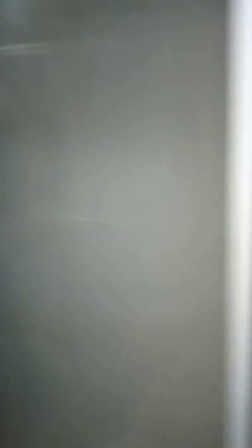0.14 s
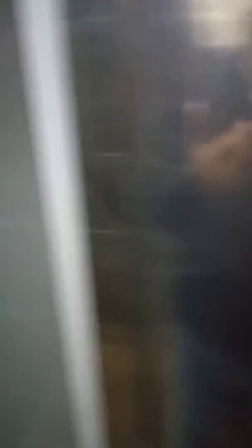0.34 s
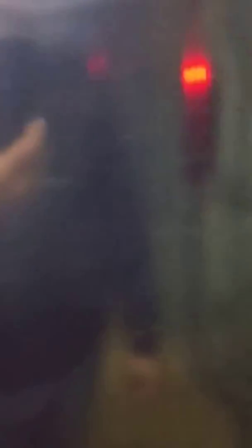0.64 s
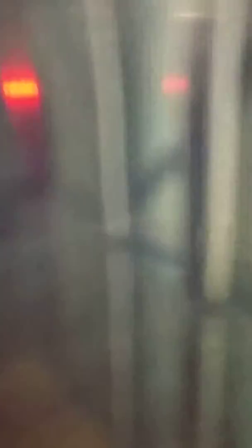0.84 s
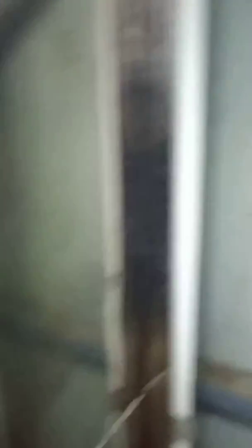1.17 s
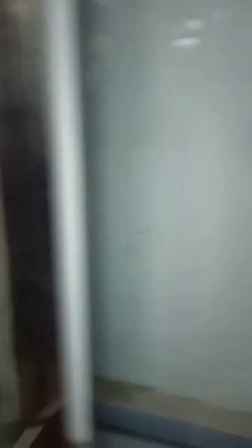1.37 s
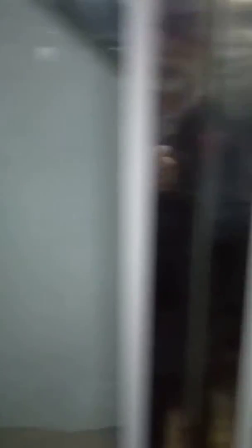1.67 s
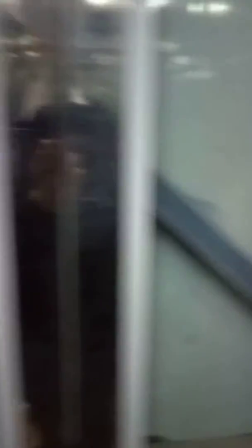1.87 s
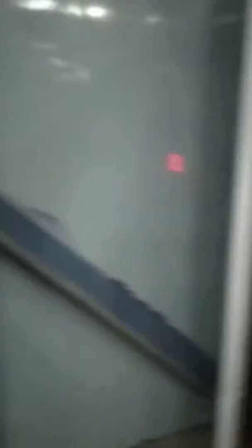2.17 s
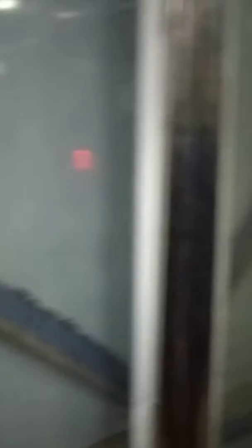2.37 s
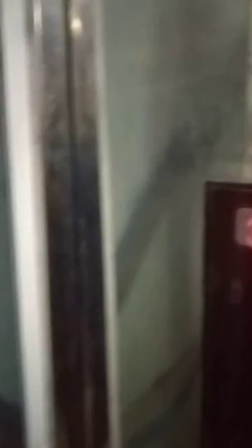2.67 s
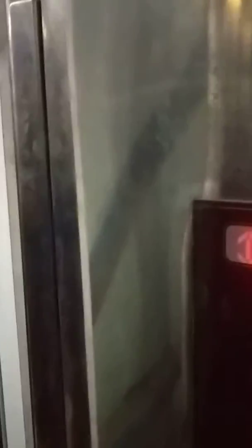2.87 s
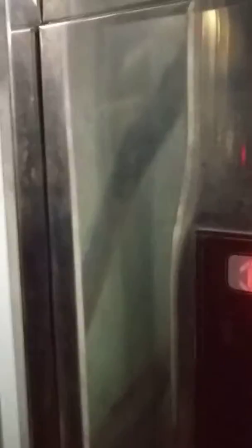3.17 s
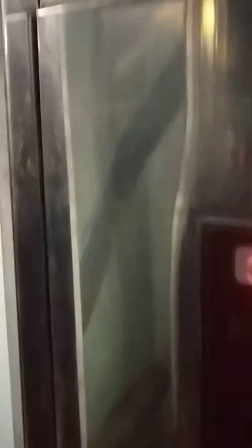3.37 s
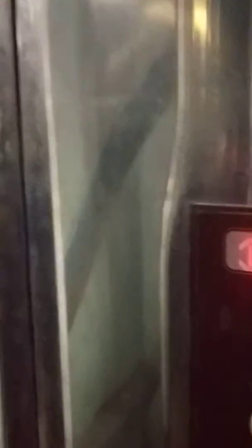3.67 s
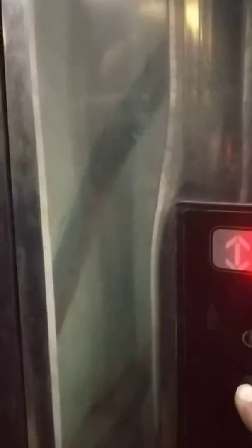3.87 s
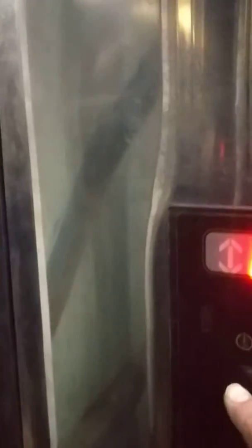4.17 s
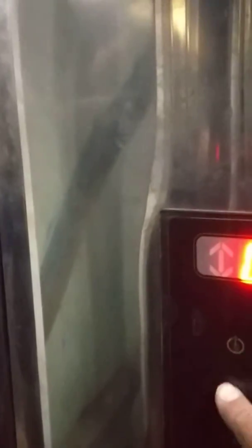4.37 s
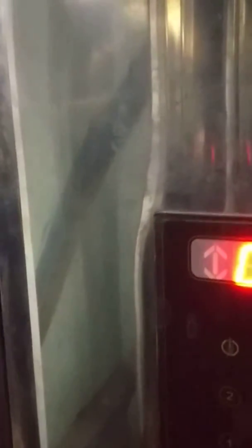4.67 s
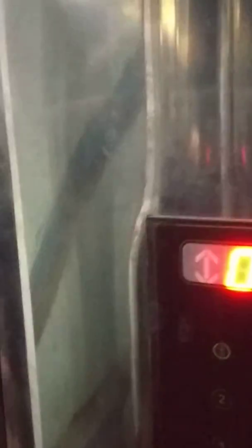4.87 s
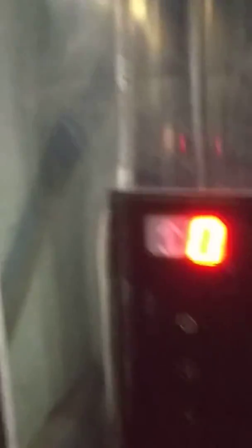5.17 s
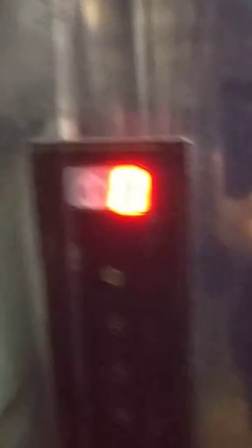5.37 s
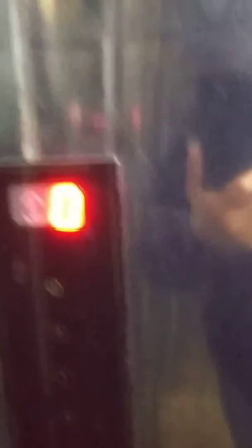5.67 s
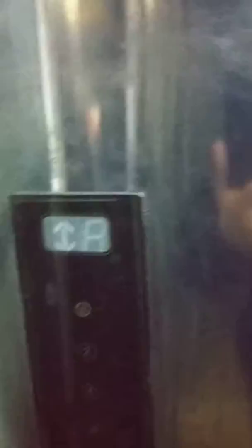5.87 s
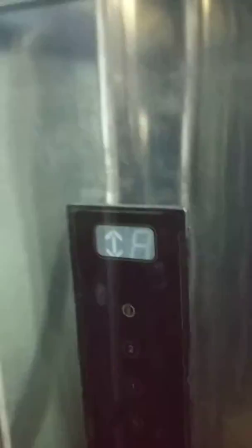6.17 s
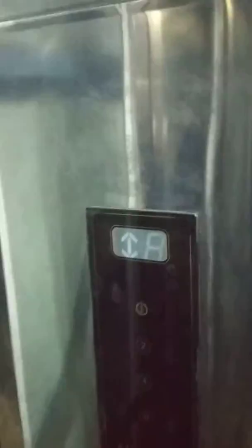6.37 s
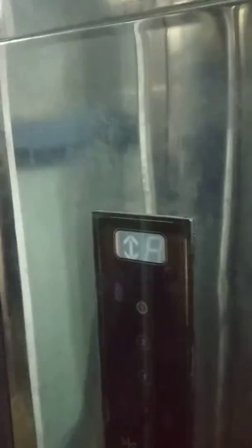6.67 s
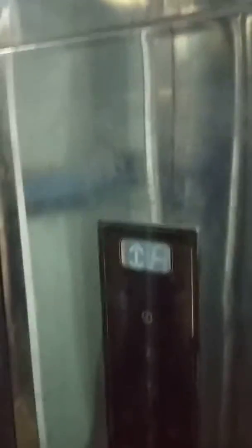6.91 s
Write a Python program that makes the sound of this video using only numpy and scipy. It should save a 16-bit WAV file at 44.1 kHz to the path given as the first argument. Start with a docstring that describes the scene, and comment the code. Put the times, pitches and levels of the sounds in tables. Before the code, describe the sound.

Inside a small humming lift, a jacket swishes and shoes scuff, a button clicks, then the car sets off with drones, rumble, knocks and rattling doors.

```python
"""A ride in a glass lift

Inside a small glass and steel lift car a passenger turns round: shoes scuff and a jacket swishes over a mains hum.
A floor button clicks, the drive whines and drones, and the car sets off with a rumble.
Its guide shoes rub along the rails and the glass doors tick and knock in their tracks.
Rubbing is shaped noise, knocks are ringing modes, and hum, drones and squeak are sine tones."""
import sys
import numpy as np
from scipy import signal
from scipy.fft import rfft, irfft
from scipy.io import wavfile

SR = 44100
rng = np.random.default_rng(int(sys.argv[2]) if len(sys.argv) > 2 else 0)


def inscribe(sig):
    """Save sig as 16-bit PCM at rate SR to the path in sys.argv[1].

    A 1-D sig is mono; a 2-D sig holds one channel per row.
    Samples are clipped to [-1, 1] before scaling.
    """
    pcm = np.round(np.clip(np.atleast_2d(sig).T, -1, 1) * 32767)
    wavfile.write(sys.argv[1], SR, pcm.astype(np.int16))


N = 310464

# Half widths below run from a peak to where the gain has halved.
# A t60 is the time in seconds for a sound to fade by 60 dB.

# Mains hum. Each row: pitch in Hz, level in dB.
HUM = [(100, -45.5), (600, -75)]
# Strength of the hum over time. Each row: time in seconds, gain in dB added to the hum.
HUM_LEVEL = [(0.6, -30), (1.4, -8.5), (1.9, -0.5), (2.6, -4.5), (3.1, 1.5), (4.35, 1), (4.6, -9)]
HUM_WOBBLE_RAD = 0.21  # phase wobble of the lowest hum tone
# Air of the shaft. Each row: frequency in Hz, strength per Hz in dB.
AIR_SPECTRUM = [(12, -6), (20, 10.5), (35, 4), (70, -2.5), (140, -11.5), (200, -18), (400, -23), (800, -33),
                (2000, -38.5), (3800, -42), (8500, -34.5), (12000, -43.5), (16000, -50.5)]
AIR_DB, STIRRED_AIR_DB = -43, 3  # the second is added until the passenger comes to rest

# Resonances of the panels. Each row: frequency in Hz, half width in Hz, level in dB.
PANEL_MODES = [(215, 7.7, 0), (267.5, 7.1, 5.5), (336, 7.1, 3.5), (452, 86, 4.5), (570, 480, -3),
               (652, 14, -5.5)]
PANEL_RING_DB, PANEL_RING_S, PANEL_RING_T60_S = -53, 0.43, 0.62

# Hollow groans of the frame. Each row: peak time in seconds, level in dB, centre in Hz,
# half width in Hz, fall time in seconds.
GROANS = [(.01, -46.5, 700, 460, 0.056), (0.892, -49.5, 970, 790, 0.093), (2.603, -46, 900, 240, 0.041),
          (2.603, -51, 1640, 110, 0.022), (4.92, -42.5, 940, 580, 0.049), (5.426, -40.5, 780, 280, 0.036),
          (5.548, -37.5, 940, 330, 0.026), (5.7, -45.5, 1990, 150, 0.059)]
GROAN_RISE_S, GROAN_JERKS_PER_S = 0.024, 140

# Soft bumps of the hand that holds the phone. Each row: time in seconds, peak in dB before the bass cut.
BUMPS = [(0.057, -25.5), (.104, -20.5), (.149, -28), (.268, -25), (0.325, -36), (.368, -29)]
BUMP_WIDTH_S = 0.0074

# Jacket swishes. Each row: start in seconds, length in seconds, attack in seconds, level in dB,
# growth over the stroke in dB, body against hiss in dB.
SWISHES = [(.27, 0.21, 0.11, -43, -2, -7), (1.065, 0.34, 0.12, -39.5, -5, -5),
           (1.34, 0.42, 0.2, -35, 1.5, -8.5), (2.745, 0.32, 0.13, -38.5, -1, -5),
           (6.6, 0.17, 0.023, -44.5, 13.5, -2)]
# Soles dragged over the floor. Each row: start in seconds, length in seconds, attack in seconds,
# level in dB, growth over the stroke in dB, body against hiss in dB.
SCUFFS = [(.68, 0.15, 0.019, -35, 3.5, -10), (2.097, 0.037, 0.01, -39, -2, -8.5),
          (2.185, 0.035, 0.039, -50, -1, -16), (2.376, 0.13, 0.07, -30, 1, -17),
          (2.408, 0.12, 0.021, -37.5, -1.5, 2.5)]
# Guide shoes catching on the rails. Each row: start in seconds, length in seconds, attack in seconds,
# level in dB, growth over the stroke in dB, body against hiss in dB.
SCRAPES = [(4.862, 0.064, 0.022, -60.5, -11, 5), (5.238, 0.03, 0.0068, -46.5, -2, -1),
           (5.748, 0.057, 0.04, -32, 2, -10.5), (6.725, 0.044, 0.037, -41, 2.5, -1.5)]
SWISH_T60_S, SCUFF_T60_S, SCRAPE_T60_S = 0.24, 0.2, 0.3
HISS_BAND_HZ, BODY_BAND_HZ = (4000, 12000), (700, 3000)  # where the two parts are set to rms 1
# Cloth of the jacket. Each row: frequency in Hz, strength per Hz in dB.
CLOTH = [(200, -8.5), (380, -4), (600, -6.5), (900, -4), (1400, -5), (2300, -0.5), (3000, -5), (3700, -6),
         (5500, 0), (9000, 2.5), (10200, 0), (11800, -10.5), (16000, -14.5)]
# Soles on the floor. Each row: frequency in Hz, strength per Hz in dB.
SOLE = [(200, -38), (600, 0), (1000, 1.5), (1300, 4), (1550, 3), (2060, 10), (3000, 2), (3700, -0.5),
        (5200, 5.5), (8500, 9), (10300, 6.5), (12000, -4), (16000, -8)]
# Guide shoes on the rails. Each row: frequency in Hz, strength per Hz in dB.
SLIDE = [(500, -0.5), (1200, 0.5), (2200, 5), (3000, 0), (3900, -4), (5500, -0.5), (9000, 1.5), (10500, -5),
         (12500, -15), (16000, -21)]
# Glass panes that sing when something rubs. Each row: frequency in Hz, half width in Hz, level in dB.
PANE_RINGS = [(1089, 2.8, -6), (2074, 2.2, 2.5), (5160, 9.2, -7)]
# The passenger turns round, stirring the jacket.
TURN_S, TURN_LENGTH_S, TURN_ATTACK_S, TURN_T60_S = 0.63, 2.537, 0.25, 0.92
RUSTLE_DB = -56

# Blows on the floor and frame. Each row: time in seconds, level in dB, contact time in seconds.
KNOCKS = [(0.684, -35, 0.01), (0.828, -36.5, 0.017), (1.8, -37.5, 0.0023), (1.808, -34, 0.012),
          (2.381, -28.5, 0.0016), (2.388, -35.5, 0.00057), (2.398, -38.5, 0.01), (2.418, -54, .0005),
          (2.503, -40.5, 0.0013), (2.521, -35, 0.0072), (2.555, -46, 0.015), (4.351, -44, 0.0016),
          (4.866, -34.5, 0.008), (4.893, -41.5, 0.0011), (5.383, -33, 0.0034), (5.515, -38.5, 0.00039),
          (5.548, -45, 0.00036), (5.747, -28, 0.0016), (5.774, -36.5, 0.00088), (5.94, -32.5, 0.012)]
# Ringing of floor and walls. Each row: frequency in Hz, level in dB, t60 in seconds.
FLOOR_MODES = [(83, -4.5, 0.079), (103, 1, 0.17), (152.7, -9.5, 0.13), (218, -1, .05), (270, 2, 0.043),
               (332, -4, 0.13), (424.5, -4, 0.31), (530, -18, 0.074), (690, 1.5, 0.093), (856, 2, 0.066),
               (1100, -8, 0.13)]

# Doors chattering in their tracks. Each row: time in seconds, level in dB, t60 in seconds.
TICKS = [(2.703, -41.5, 0.53), (5.113, -42.5, 0.13), (5.29, -38, .12), (5.357, -32, 0.34),
         (6.242, -37.5, 0.29), (6.339, -32, 0.017), (6.973, -40, 0.18)]
# Glass doors against metal. Each row: frequency in Hz, strength per Hz in dB.
DOOR = [(500, -6.5), (2100, -12), (3700, -11.5), (5500, -10), (8000, -4.5), (10000, -8.5), (12000, -22),
        (16000, -30)]
ONSET_S, CHATTER_RISE_S = 0.0014, 0.0016

# Snap and end stop of the button. Each row: time in seconds, crack in dB, ring in dB.
BUTTON = [(4.323, -34.5, -51), (4.34, -43, -48.5), (4.352, -43, -42.5), (4.363, -48, -45)]
# Button spring and panel modes. Each row: frequency in Hz, half width in Hz, level in dB, t60 in seconds.
BUTTON_MODES = [(390, 45, 2.5, 0.047), (2400, 230, -5.5, 0.067), (3350, 310, -24, 0.039),
                (5070, 110, -11, 0.11), (6550, 260, -8.5, 0.085), (8950, 200, -4, 0.1)]
# Crack of the spring. Each row: frequency in Hz, strength per Hz in dB.
CRACK = [(400, -8), (900, -11), (1500, -9), (2400, -12), (4000, -15), (5000, -6), (5900, -13), (8000, 4),
         (9600, 9), (12000, -7), (16000, -9)]
CRACK_T60_S, SNAP_TICK_DB, SNAP_TICK_T60_S = 0.072, -3, 0.0082

# Drones of the loaded frame. Each row: start in seconds, length in seconds, starting pitch in Hz,
# level in dB, growth in dB.
DRONES = [(4.372, 0.34, 268, -54.5, 1), (4.374, 0.13, 169, -43.5, -6), (4.408, 0.255, 202.3, -44.5, -5),
          (4.443, 0.19, 133.1, -42, -9.5), (4.666, 0.23, 138.5, -35.5, 4.5)]
SAG_HZ_PER_S, DRONE_ATTACK_S, DRONE_T60_S = 29.6, 0.043, 0.2
DRONE_WAVER, DRONE_THROB_DB = 0.0242, 2.5  # pitch waver as a fraction, level waver
# Shudder of the frame. Each row: frequency in Hz, half width in Hz, level in dB.
FRAME_MODES = [(106, 21, 4), (170, 21, 4), (250, 13, -2.5), (350, 66, -10.5)]
# Switching whine and its skirt. Each row: frequency in Hz, half width in Hz, level in dB.
WHINE = [(12000, 20, -4), (12060, 150, -4)]
DRIVE_ON_S, BRAKE_OFF_S, DRIVE_ATTACK_S = 4.38, 4.78, 0.066
SHUDDER_DB, WHINE_DB = -47, -63.5

# Low rumble of the ride. Each row: frequency in Hz, strength per Hz in dB.
RUMBLE = [(15, 3.5), (30, -2), (70, -10), (140, -8.5), (250, -23.5), (600, -36), (2000, -74)]
# Resonances of the moving car. Each row: frequency in Hz, half width in Hz, level in dB.
CAR_MODES = [(71.2, 21, 0.5), (135, 34, -4.5)]
# Resonances of the rails. Each row: frequency in Hz, half width in Hz, level in dB.
RAIL_MODES = [(730, 123, 8.5), (940, 34, -13), (1080, 11, -5), (1350, 320, 0), (2010, 11, -21)]
SET_OFF_S, RUN_UP_S = 4.615, 0.82
# Levels at full speed, before the shoes bind.
RUMBLE_DB, CAR_DB, PANEL_DB, RAIL_DB, SLIDE_DB = -34.5, -37, -43.5, -53.5, -48
# The guide shoes bind for a moment as the car leaves the landing, which lifts these sounds.
BIND_S, BIND_WIDTH_S = 5.51, 0.42
BIND_CAR_DB, BIND_RAIL_DB, BIND_SLIDE_DB = 2.5, 8, 5.5

SQUEAK_S, SQUEAK_HZ, SQUEAK_DB, SQUEAK_WIDTH_S = 5.232, 930, -41, 0.015
SQUEAK_TAIL_DB, SQUEAK_TAIL_S = -18, 0.075
TOP_HZ = 15850  # highest frequency kept

T = np.arange(N) / SR
FREQ = np.maximum(np.arange(N // 2 + 1) * SR / N, 1)


def undb(db):
    """Turn decibels into gain."""
    return 10 ** (np.asarray(db) / 20)


def walk(rate):
    """Random wander with spread near 1, drawn as straight lines between random points, rate per second."""
    knots = rng.standard_normal(2048)
    return 1.344 * np.interp(T * rate, np.arange(len(knots)), knots)


def colour(points):
    """Gain at each frequency, drawn through (Hz, dB) points."""
    hz, db = np.transpose(points)
    return undb(np.interp(np.log(FREQ), np.log(hz), db))


def resonances(modes):
    """Gain at each frequency of resonances with steep skirts."""
    gain = 0
    for hz, width, db in modes:
        distance = (FREQ ** 2 - hz ** 2) / (FREQ * width * 2)
        gain = gain + undb(db) / np.sqrt(width) / (1 + distance ** 2)
    return gain


def noise(shape, band=(0, SR), grain_db=0, apart_hz=800, left_db=4):
    """Grainy stereo noise: both sides share the bass, differ higher up, and lean left if left_db is positive."""
    grains = undb(grain_db * np.repeat(rng.standard_normal(N // 16 + 1), 16)[:N])
    mid, side = rfft(rng.standard_normal((2, N)) * grains) * shape
    spread = FREQ / np.hypot(FREQ, apart_hz)
    sides = np.array([[1], [-1]])  # left, right
    lean = colour([(550, -0.66), (1000, left_db), (5000, left_db), (12000, 0.57)]) ** (sides / 2)
    # the shared part is set to rms 1 within the band
    inside = irfft(mid * (FREQ > band[0]) * (FREQ < band[1]), N)
    return irfft((mid + sides * side * spread) * lean, N) / np.std(inside)


def decay(start, t60, rise=0.000094):
    """Envelope of a blow: a quick rise, then an exponential fade."""
    age = np.maximum(T - start, 0)
    fade = np.exp(-np.minimum(np.log(1000) * age / t60, 50))
    return (1 - np.exp(-age / rise)) * fade


def stroke(start, length, attack, t60, growth_db=0):
    """Envelope of a movement: it sets in, holds while growing or easing, and dies away."""
    age = T - start
    onset = np.sin(np.pi / 2 * np.clip(age / attack, 0, 1)) ** 2
    hold = undb(growth_db * (np.clip(age / length, 0, 1) - .5))
    fade = np.exp(-np.minimum(np.log(1000) * np.maximum(age - length, 0) / t60, 20))
    return onset * hold * fade


def stick_slip(rate, scatter_db, t60, count=1400):
    """Envelope, rms 1, of a contact that sticks and lets go in uneven jerks, about rate per second."""
    gaps = rng.gamma(3, 1 / 3, count)
    sizes = rng.standard_normal(count)
    at = (np.cumsum(gaps) * SR / rate).astype(int)
    jerks = np.bincount(at, undb(scatter_db * sizes), N)[:N]
    slips = signal.fftconvolve(jerks, decay(0, t60, ONSET_S)[:SR // 10])[:N]
    return slips / np.sqrt(np.mean(slips ** 2))


def ring(modes, scatter_db):
    """Ringing of struck modes: neighbours swing in opposite directions, each blow weights them differently."""
    t = T[:SR // 2]
    out = 0
    for k, (hz, db, t60) in enumerate(modes):
        gain = (-1) ** k * undb(db + scatter_db * rng.standard_normal())
        out = out + gain * np.sin(2 * np.pi * hz * t) * np.exp(-np.log(1000) * t / t60)
    return out


def add(out, start, sound):
    """Mix a sound in at its time."""
    i = max(int(start * SR), 0)
    out[..., i:i + sound.shape[-1]] += sound[..., :N - i]


def cabin(x, wet_db, t60=0.48):
    """Close hard walls: a dense, short echo that differs between left and right above the bass."""
    walls = noise(colour([(100, 4.0), (9000, -2.5), (16000, -19)]))
    tail = (walls * decay(0.00335, t60))[:, :SR // 2]
    tail = tail / np.sqrt(np.sum(tail ** 2) / 2)
    return x + undb(wet_db) * signal.fftconvolve(np.atleast_2d(x), tail, axes=1)[:, :N]


def reflections(count=9):
    """Colour of the nearest panes: faint copies a few milliseconds late, and the panes' own rings."""
    lags = rng.uniform(.003, .016, count)
    comb = np.abs(1 + .1 * np.exp(-2j * np.pi * np.outer(lags, FREQ)).sum(axis=0))
    rings = sum(undb(db) / (1 + ((FREQ - hz) / width) ** 2) for hz, width, db in PANE_RINGS)
    return comb * (1 + rings)


def rub(strokes, spectrum, t60, grain_db, catch_db):
    """Friction as grainy noise for tiny slips; each stroke has its own mix of mid-range body and bright hiss."""
    shape = colour(spectrum) * reflections()
    low = 1 / (1 + (FREQ / 3500) ** 6)
    hiss = noise(shape * np.sqrt(1 - low), HISS_BAND_HZ, grain_db)
    body = noise(shape * np.sqrt(low), BODY_BAND_HZ, grain_db)
    out = 0
    for s, length, attack, db, growth_db, body_db in strokes:
        mix = hiss + undb(body_db) * body
        out = out + undb(db) * mix * stroke(s, length, attack, t60, growth_db)
    return out * undb(catch_db * walk(40))  # the contact catches and eases


def hum():
    """Mains hum: steady sine tones with a slight shared wobble and a changing strength."""
    wobble = HUM_WOBBLE_RAD * walk(13) / HUM[0][0]
    tones = sum(undb(db) * np.sqrt(2) * np.sin(hz * (2 * np.pi * T + wobble)) for hz, db in HUM)
    return tones * undb(np.interp(T, *np.transpose(HUM_LEVEL)) + 1.5 * walk(9))


def shaft_air():
    """Air of the shaft: soft noise that settles as the passenger comes to rest."""
    stirred = np.clip(TURN_S + TURN_LENGTH_S + .5 - T, 0, 1)
    return noise(colour(AIR_SPECTRUM)) * undb(AIR_DB + STIRRED_AIR_DB * stirred + walk(6.1))


def panel_ring():
    """Panels ringing faintly at first: noise through their resonances, fading away."""
    fading = stroke(0, PANEL_RING_S, ONSET_S, PANEL_RING_T60_S)
    return undb(PANEL_RING_DB) * noise(resonances(PANEL_MODES)) * fading


def groans():
    """Short hollow, jerky rubs of the frame, some while the car stands and some as it travels."""
    out = 0
    for s, db, hz, width, fall in GROANS:
        swell = np.exp(-np.maximum((s - T) / GROAN_RISE_S, (T - s) / fall))
        out = out + undb(db) * swell * noise(resonances([(hz, width, 0)]))
    return out * stick_slip(GROAN_JERKS_PER_S, scatter_db=1, t60=.1)


def handling():
    """The hand shifts on the phone: deep, soft pressure bumps, with the part below 10 Hz weakened."""
    pushes = sum(undb(db) * np.exp(-((T - s) / BUMP_WIDTH_S) ** 2) for s, db in BUMPS)
    return signal.sosfilt(signal.butter(1, 10, "high", fs=SR, output="sos"), pushes)


def jacket():
    """Cloth rubs on cloth in distinct swishes."""
    return rub(SWISHES, CLOTH, SWISH_T60_S, grain_db=1.5, catch_db=0.4)


def rustle():
    """The jacket never keeps quite still while its wearer turns: a faint run of cloth noise."""
    turning = stroke(TURN_S, TURN_LENGTH_S, TURN_ATTACK_S, TURN_T60_S)
    return undb(RUSTLE_DB) * turning * noise(colour(CLOTH), grain_db=1.5)


def shoes():
    """Soles drag over the floor with a grainy hiss."""
    return rub(SCUFFS, SOLE, SCUFF_T60_S, grain_db=1.0, catch_db=1.4)


def knocks():
    """Heels and jolts ring the floor and its many small modes; a soft contact only reaches the low ones."""
    out = np.zeros(N)
    for s, db, contact in KNOCKS:
        t = T[:SR // 20]
        push = t * np.exp(-t / (contact / 4))  # strongest a quarter of the way through the contact
        dense = undb(15.5) * (rng.standard_normal(N) * decay(0, 0.15))[:SR // 2]  # the many small modes
        floor = ring(FLOOR_MODES, scatter_db=.7)
        blow = signal.fftconvolve(floor + dense, push)
        add(out, s, -undb(db) * blow / np.std(blow[:SR // 30]))
    return cabin(out, wet_db=-6.5, t60=0.52)


def doors():
    """Each tick sets off a fine chatter of glass against metal, made of fading noise."""
    chatter = noise(colour(DOOR) * reflections(), grain_db=1.5)
    return chatter * sum(undb(db) * decay(s, t60, CHATTER_RISE_S) for s, db, t60 in TICKS)


def button():
    """A snap spring ticks and cracks; its end stop clacks in clusters of close, quickly damped panel modes."""
    snaps = 0
    for s, crack_db, _ in BUTTON:
        tick = undb(SNAP_TICK_DB) * decay(s, SNAP_TICK_T60_S)
        snaps = snaps + undb(crack_db) * (decay(s, CRACK_T60_S) + tick)
    crack = noise(colour(CRACK), left_db=-2.0) * snaps
    clack = 0
    for hz, width, db, t60 in BUTTON_MODES:
        blows = sum(undb(ring_db) * decay(s, t60, ONSET_S) for s, _, ring_db in BUTTON)
        clack = clack + undb(db) * blows * noise(resonances([(hz, width, 0)]), left_db=2.5)
    return cabin(crack + clack, wet_db=-6, t60=0.17)


def motor():
    """The drive starts with a thin whine; the straining motor draws rough, sagging drones from the frame."""
    drones = 0
    for s, length, start_hz, db, growth_db in DRONES:
        sagging_hz = start_hz - SAG_HZ_PER_S * np.clip(T - s, 0, length)
        hz = sagging_hz * (1 + DRONE_WAVER * walk(60))
        tone = np.sqrt(2) * np.sin(2 * np.pi * np.cumsum(hz) / SR)
        level = undb(db + DRONE_THROB_DB * walk(45))
        drones = drones + level * tone * stroke(s, length, DRONE_ATTACK_S, DRONE_T60_S, growth_db)
    # the strain grows until the brake lets go, then fades slowly
    strain = stroke(DRIVE_ON_S, BRAKE_OFF_S - DRIVE_ON_S, DRIVE_ATTACK_S, t60=5.9, growth_db=8.0)
    shudder = undb(SHUDDER_DB) * noise(resonances(FRAME_MODES)) * strain
    switch_on = np.clip((T - DRIVE_ON_S) / DRIVE_ATTACK_S, 0, 1)
    whine = undb(WHINE_DB) * noise(resonances(WHINE)) * switch_on
    return drones + shudder + whine


def ride():
    """Rollers shake the car and panels while guide shoes rub the rails; all grow as the car gathers speed."""
    speed = np.clip((T - SET_OFF_S) / RUN_UP_S, 0, 1)  # 1 is full speed
    bind = np.exp(-((T - BIND_S) / BIND_WIDTH_S) ** 2)
    rumble = undb(RUMBLE_DB) * speed ** 4 * noise(colour(RUMBLE))
    car = undb(CAR_DB) * speed ** 0.3 * noise(resonances(CAR_MODES))
    panels = undb(PANEL_DB) * speed ** 2 * noise(resonances(PANEL_MODES))
    pressure = undb(walk(25))  # the shoes bear unevenly on the rails
    jerks = stick_slip(rate=130, scatter_db=1.5, t60=.09)
    rail_noise = noise(resonances(RAIL_MODES) * reflections(), grain_db=-3.5)
    rails = undb(RAIL_DB + BIND_RAIL_DB * bind) * speed ** 2 * rail_noise
    slide_noise = noise(colour(SLIDE) * reflections(), grain_db=-1.0)
    slide = undb(SLIDE_DB + BIND_SLIDE_DB * bind) * speed ** 0.77 * slide_noise
    shaking = (car + panels) * undb(BIND_CAR_DB * bind)
    return rumble + shaking + pressure * (jerks * rails + slide)


def scrapes():
    """Guide shoes catch on the rails: short rubs broken into stick-slip jerks."""
    rubs = rub(SCRAPES, SLIDE, SCRAPE_T60_S, grain_db=-0.5, catch_db=-1.3)
    return rubs * stick_slip(rate=160, scatter_db=0.5, t60=0.14)


def squeak():
    """A guide shoe sings briefly on the dry rail: a wavering tone, faint before and after its peak."""
    away = T - SQUEAK_S
    peak = np.exp(-(away / SQUEAK_WIDTH_S) ** 2)
    tail = undb(SQUEAK_TAIL_DB) * np.exp(-(away / SQUEAK_TAIL_S) ** 2)
    hz = SQUEAK_HZ * (1 + 0.029 * walk(260))
    tone = np.sqrt(2) * np.sin(2 * np.pi * np.cumsum(hz) / SR)
    return cabin(undb(SQUEAK_DB) * (peak + tail) * tone, wet_db=0.0)


def scene():
    """Everything heard from the middle of the car."""
    background = hum() + shaft_air() + panel_ring()
    passenger = handling() + jacket() + rustle() + shoes() + button()
    frame = groans() + knocks() + doors()
    travel = motor() + ride() + scrapes() + squeak()
    return background + passenger + frame + travel


def record(dry):
    """The phone cuts the top: a steep filter removes the highest treble."""
    return signal.sosfilt(signal.ellip(10, .2, 80, TOP_HZ, fs=SR, output="sos"), dry)


dry = scene()
out = record(dry)
inscribe(out)
```